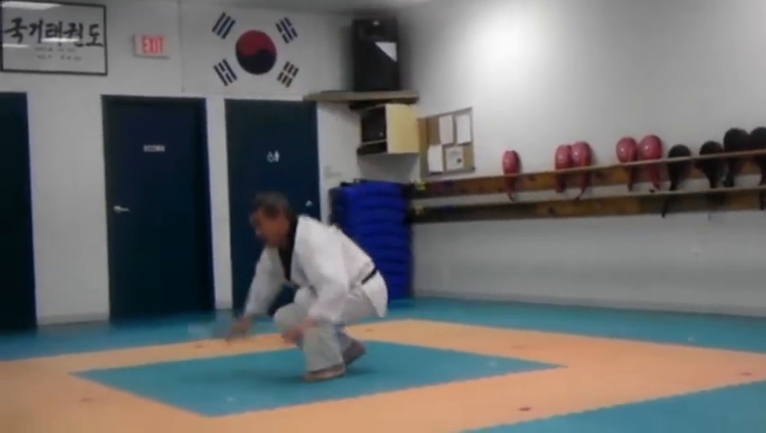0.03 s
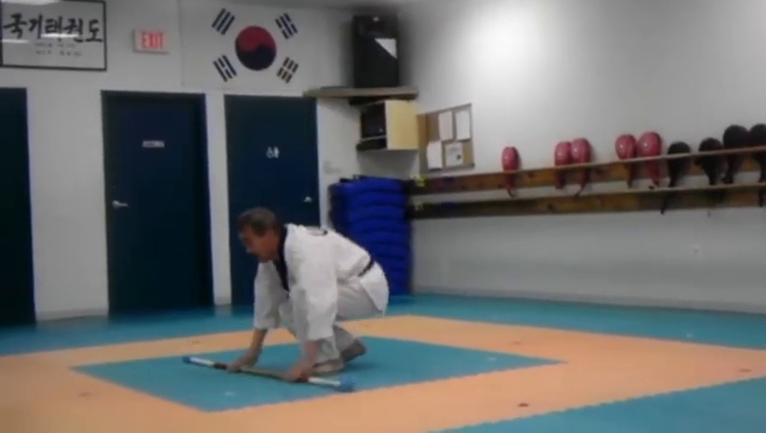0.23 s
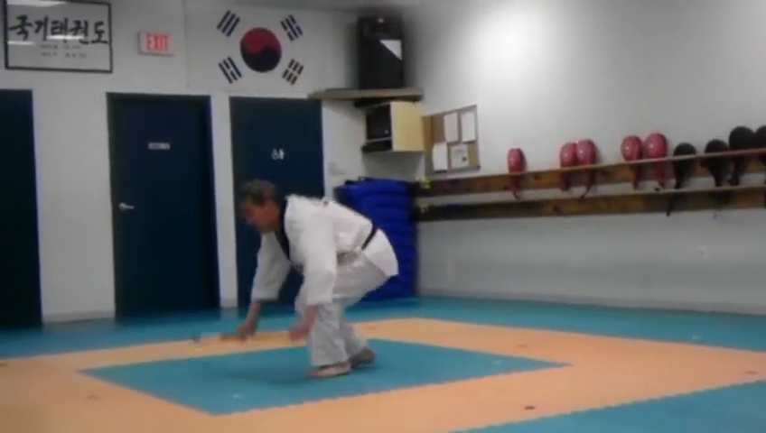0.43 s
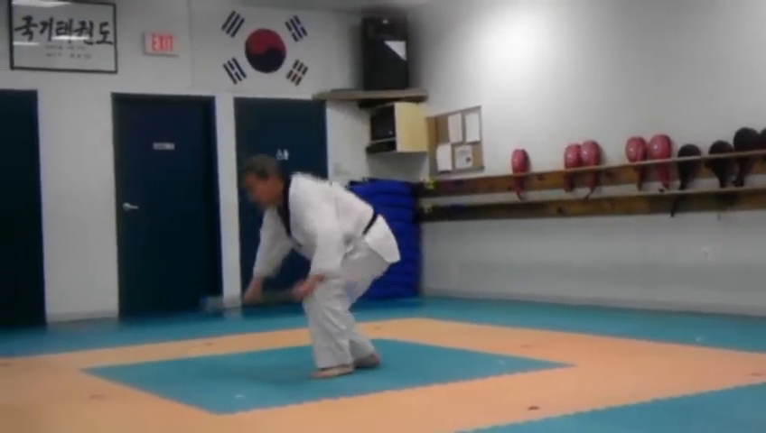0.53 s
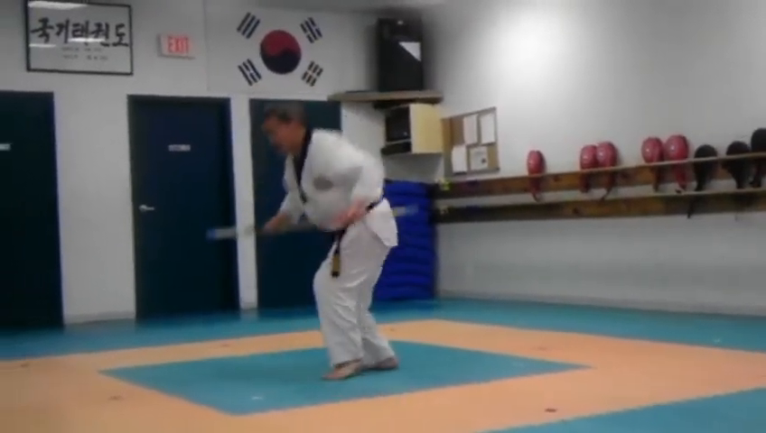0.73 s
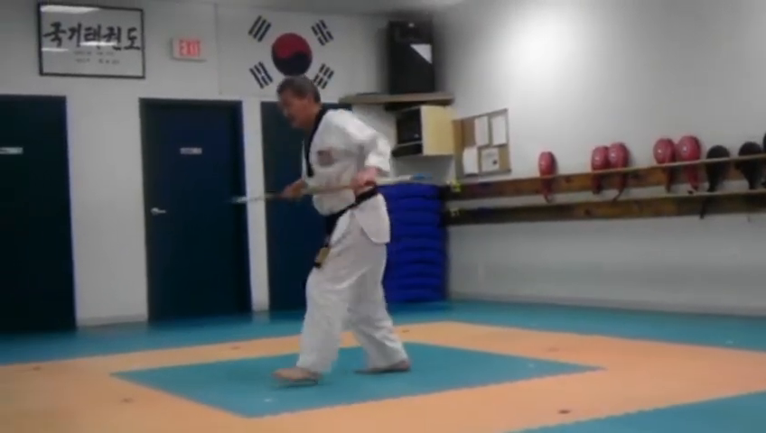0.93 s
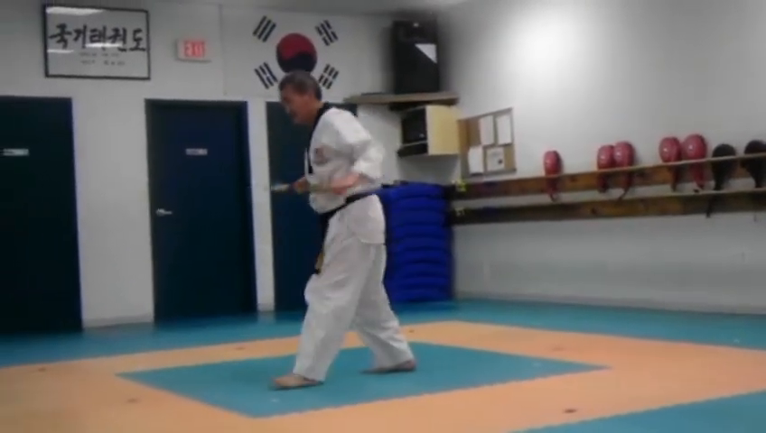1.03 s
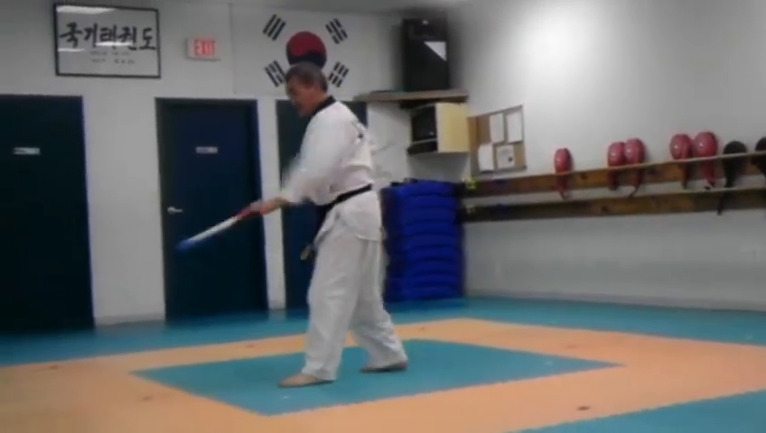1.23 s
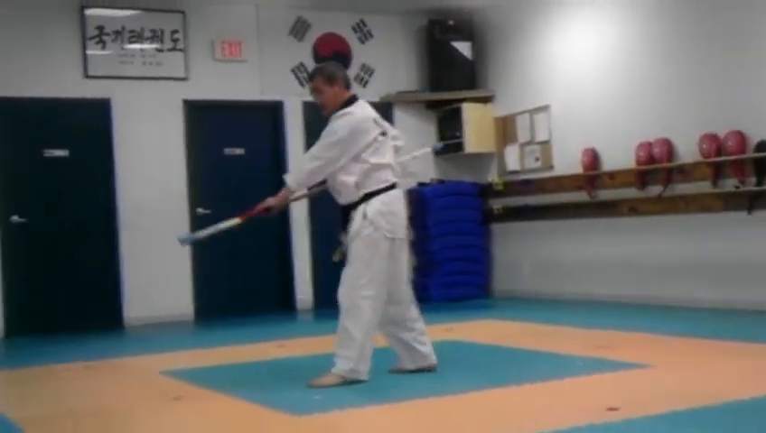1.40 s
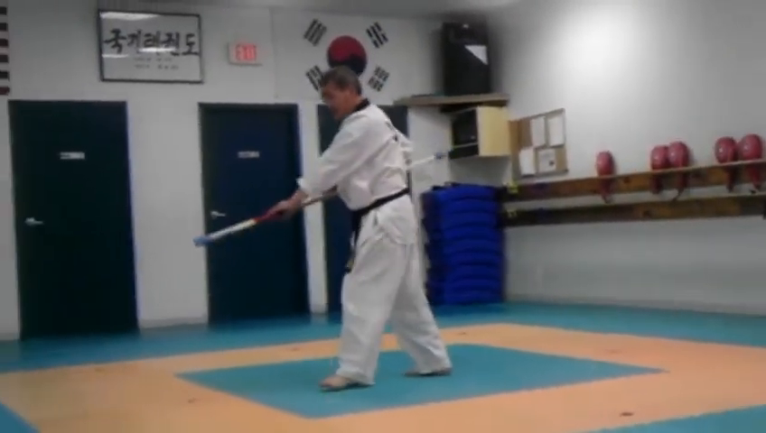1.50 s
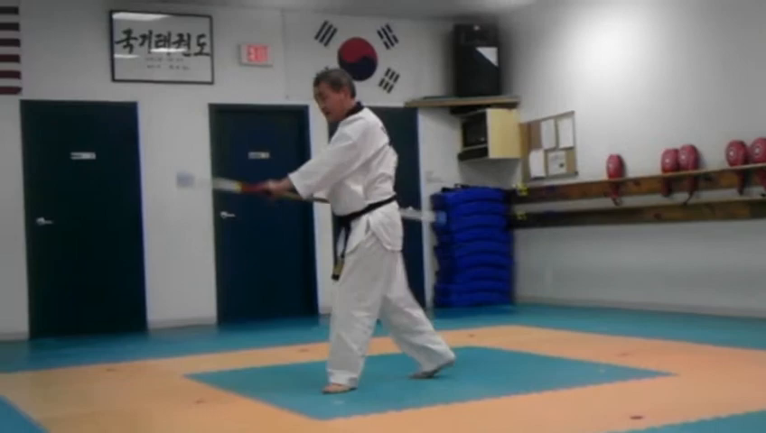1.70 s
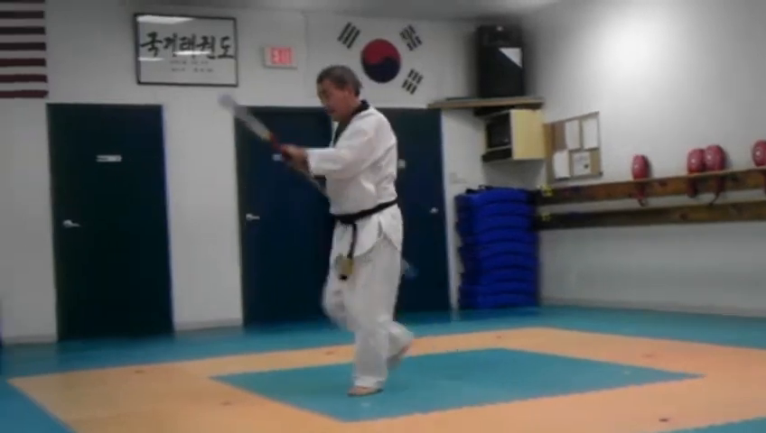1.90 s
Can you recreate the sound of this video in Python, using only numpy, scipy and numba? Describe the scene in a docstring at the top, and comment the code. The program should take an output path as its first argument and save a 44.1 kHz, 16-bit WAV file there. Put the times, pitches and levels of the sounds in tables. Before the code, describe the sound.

Over low ventilation noise and hum, a staff hits the matted floor with a sharp crack overloading a distant microphone; echoes and a roomy tail fade, then quiet cloth swishes, small snaps and dull barefoot steps.

```python
"""Ventilation rumble, hiss and a steady hum fill a bare training hall, with faint cloth: filtered noise and a sine.
Soon a wooden staff is slapped flat onto foam mats: one end touches, then the whole length lands with a crack.
Short pushes ring modes of staff and mat and press out noise; the blow overloads the recorder,
comes back off the walls as filtered echoes and rings on in the hall as decaying noise.
A second later bare feet pad on the mat and the uniform rustles and snaps with a swing of the staff: shaped noise."""
import sys
import numpy as np
from scipy import signal
from scipy.fft import rfft, irfft
from scipy.io import wavfile
from numba import njit

SR = 44100
rng = np.random.default_rng(int(sys.argv[2]) if len(sys.argv) > 2 else 0)


def master(y):
    """Save y as 16-bit WAV."""
    cut = np.clip(np.atleast_2d(y).T, -1, 1)
    pcm = np.round(cut * 32767)  # scale
    wavfile.write(sys.argv[1], SR, pcm.astype(np.int16))


N = 85995

# Modes of the staff lying on the mat. Each row: frequency in Hz, relative level in dB, 60 dB decay in s.
STAFF_MODES = [(333, -17, 0.44), (438, 0.5, 0.055), (541, 0, 0.021), (825, -11, 0.07), (1360, -21, 0.044),
               (1800, -25, 0.036), (1930, -28.5, 0.02), (2310, -31, .03), (2665, -22.5, 0.028),
               (3030, -24, .025)]


def undb(db):
    """Decibels to gain."""
    return 10 ** (np.asarray(db) / 20)


def along(points, hz, axis=1):
    """Read a column of a table on a log-frequency axis."""
    rows = np.array(points, float)
    log_hz = np.log(np.maximum(hz, 1))
    return np.interp(log_hz, np.log(rows[:, 0]), rows[:, axis])


def bins():
    """Frequencies in Hz of the spectrum of a whole track."""
    return np.arange(N // 2 + 1) * SR / N


def noise(colour):
    """Stereo noise of rms 1 in the given colour, wider in the treble."""
    # Stereo width. Each row: frequency in Hz, side against mid in dB.
    width = [(60, -20), (250, -14), (500, -13), (1000, -0.5), (3000, -1.5), (14000, -2)]
    mid, side = rfft(rng.standard_normal((2, N)))
    side = side * undb(along(width, bins()))
    left_right = np.array([mid + side, mid - side])
    x = irfft(left_right * undb(along(colour, bins())), N)
    return x / x.std()


def fade(t, t60):
    """Silence before time 0, then a fall of 60 dB in t60 seconds."""
    return (t >= 0) * np.exp(-np.log(1000) * np.maximum(t, 0) / t60)


def background(t):
    """The rumble and hiss of the ventilation as coloured noise, and mains hum as one sine."""
    # Colour of the room air. Each row: frequency in Hz, relative level in dB per Hz.
    air_colour = [(30, -36.5), (60, -13.5), (110, -9.5), (170, -1.5), (300, -5.5), (550, -13.5), (900, -16),
                  (1400, -22.5), (2200, -20.5), (3200, -29), (5300, -35.5), (6500, -43), (9500, -32.5),
                  (13500, -31)]
    air_db, hum_db, hum_hz = -55, -62.5, 119  # rms levels
    hum = np.sqrt(2) * np.sin(2 * np.pi * hum_hz * t)
    return undb(air_db) * noise(air_colour) + undb(hum_db) * hum


def uniform(t):
    """Heavy cotton sweeps through the air: a dull rush and a bright rub, both fluttering with the folds."""
    # Sweeps of sleeves and trousers. Each row: peak time in s, level in dB,
    # time constants of rise and of fall in s, rub against rush in dB.
    swishes = [(0.099, -55.5, 0.61, 0.66, -3.5), (0.84, -55.5, 0.099, 0.13, -3.5),
               (1.158, -54.5, 0.041, 0.12, -7.5), (1.269, -48.5, 0.024, 0.044, -4.5),
               (1.341, -49, 0.024, 0.049, 0), (1.388, -44.5, 0.026, 0.045, -33),
               (1.46, -52, 0.06, 0.064, -7)]
    # Colours of the dull rush and the bright rub. Each row: frequency in Hz, relative level in dB per Hz.
    rush_colour = [(100, -18.5), (200, -4), (400, -6), (600, -4.5), (900, -10.5), (1400, -16), (2200, -11),
                   (3200, -28.5), (6000, -40), (14000, -52.5)]
    rub_colour = [(1000, -33), (2200, 0), (3300, -7.5), (5200, -5), (6800, -12), (10500, -6.5),
                  (13000, -8.5)]
    flutter_db, flutter_hz = 1.5, 118.2  # spread of the random levels, and how many per second
    rush, rub = 0, 0
    for at, db, rise, fall, treble_db in swishes:
        swell = undb(db) * np.exp(np.minimum((t - at) / rise, (at - t) / fall))
        rush = rush + swell
        rub = rub + swell * undb(treble_db)
    folds = np.interp(t * flutter_hz, np.arange(1000), rng.standard_normal(1000))
    return undb(flutter_db * folds) * (rush * noise(rush_colour) + rub * noise(rub_colour))


def ring(t, hz, t60):
    """One mode after a push at time 0: a cosine that dies away."""
    return np.cos(2 * np.pi * hz * t) * fade(t, t60)


def ring_modes(t, modes):
    """All modes of a body ringing together after one push."""
    return sum(undb(db) * ring(t, hz, t60) for hz, db, t60 in modes)


def push(t, at, ms):
    """A smooth pulse of force that lasts as long as the contact; its sum is 1."""
    force = np.sin(np.pi * np.clip((t - at) * 1000 / ms, 0, 1)) ** 2
    return force / force.sum()


def delay(x, s):
    """One channel, s seconds later."""
    return np.interp(np.arange(N) - s * SR, np.arange(N), x, left=0)


def staff(t):
    """Each contact rings the staff, thumps the mat and squeezes out a crack; a longer contact is duller."""
    # Contacts of staff and mat. Each row: start in s, push on the staff in relative dB,
    # contact time in ms, crack in relative dB, push on the mat in relative dB.
    contacts = [(0.2277, -46, 0.44, -37, -71.5), (0.23, -15.5, 2.2, -51, -60.5),
                (0.2332, -18.5, 0.97, -36, -57.5), (0.2411, -9.5, 1.42, -25, -44.5),
                (0.2444, -6.5, 2.15, -26.5, -47.5), (0.2462, -15.5, 0.83, -1, -33),
                (0.248, -4, 0.85, -12, -28.5), (0.2516, 2, 1.33, -17, -8.5), (0.2553, 0, 1.4, -17, -29)]
    # Modes of the mat and the floor under it. Each row: frequency in Hz, relative level in dB, 60 dB decay in s.
    mat_modes = [(95, -2.5, 0.027), (168, 5.5, 0.029)]
    # Colour of the crack. Each row: frequency in Hz, relative level in dB per Hz.
    crack_colour = [(300, -6.5), (900, 15), (1600, -1), (3000, -4), (3800, -15), (5500, -16), (7500, -23),
                    (10500, -17.5), (14000, -18.5)]
    crack_t60_s, right_lag_s, blow_db = 0.021, 0.055 / 1000, 9.5
    on_staff, on_mat, crack = 0, 0, 0
    for at, db, contact_ms, crack_db, thump_db in contacts:
        force = push(t, at, contact_ms)
        on_staff = on_staff + undb(db) * force
        on_mat = on_mat + undb(thump_db) * force
        # the running sum of the force gives the crack its onset
        crack = crack + undb(crack_db) * np.cumsum(force) * fade(t - at, crack_t60_s)
    wood = signal.fftconvolve(on_staff, ring_modes(t, STAFF_MODES))
    thump = signal.fftconvolve(on_mat, ring_modes(t, mat_modes))
    body = (wood + thump)[:N]
    stereo_body = np.array([body, delay(body, right_lag_s)])
    return undb(blow_db) * (stereo_body + crack * noise(crack_colour))


def walls(x):
    """The first distinct reflections, robbed of bass and top by the surfaces."""
    # Reflections from ceiling and walls. Each row: delay in s, level in dB, left against right in dB.
    echoes = [(0.0184, -14, -4.5), (0.036, -12.5, 0)]
    low_hz, top_hz = 260, 5130
    band = signal.butter(2, [low_hz, top_hz], "band", fs=SR, output="sos")
    dull = signal.sosfilt(band, x)
    out = 0
    for s, db, pan in echoes:
        gain = undb(db + np.array([[pan], [-pan]]) / 2)
        out = out + gain * np.array([delay(channel, s) for channel in dull])
    return out


def spread_blow(t):
    """The blow as it spreads into the hall: one broad slap, with the ring of the staff behind it."""
    # Slap that the whole staff sends into the hall. Each row: frequency in Hz, relative level in dB.
    slap_colour = [(60, 22.5), (110, 24), (190, 40.5), (300, 45), (400, 50.5), (600, 47), (800, 40.5),
                   (1050, 42), (1400, 34), (2200, 26), (3100, 23.5), (3700, 20), (5000, 20), (14000, 17.5)]
    slap_s, ring_db = 0.248, 0.5
    at_slap = np.exp(-2j * np.pi * bins() * slap_s)  # phase that puts the pulse at its time
    slap = irfft(undb(along(slap_colour, bins())) * at_slap, N)
    return slap + undb(ring_db) * ring_modes(t - slap_s, STAFF_MODES)


def hall(t):
    """Diffuse response of the hall: each third of an octave builds up, then dies at its own rate."""
    # Ring of the hall. Each row: frequency in Hz, relative level in dB, 60 dB decay in s,
    # build-up time constant in s; the low boom comes late.
    hall_ring = [(60, -41, .4, .01), (118.5, -8.5, 1.9, 0.0053), (202, 1, 0.93, 0.0067),
                 (280, 9.5, 0.94, 0.18), (360, 1.5, 0.59, .03), (427, 3.5, 0.33, 0.024),
                 (576, 2.5, 0.59, 0.024), (770, 6.5, 0.78, 0.0031), (980, -5, 1, .008),
                 (1497, -5.5, 0.85, 0.003), (2370, -1, 0.77, .008), (3100, -13, 0.79, 0.0045),
                 (4940, 0, 0.61, 0.0027), (7500, -11.5, 0.083, 0.0017), (14000, -15, .1, 0.0026)]
    spectrum = rfft(noise([(20, 0), (20000, 0)]))
    place = 3 * np.log2(np.maximum(bins(), 1) / 40)  # thirds of an octave above 40 Hz
    out = 0
    for k in range(27):
        hz = 40 * 2 ** (k / 3)
        band = irfft(spectrum * np.maximum(1 - abs(place - k), 0), N)  # overlapping triangles
        build = 1 - np.exp(-t / along(hall_ring, hz, axis=3))
        decay = fade(t, along(hall_ring, hz, axis=2))
        out = out + band * undb(along(hall_ring, hz)) * build * decay
    return out * np.sqrt(2 * np.log(1000) / SR)


def feet(t):
    """Bare feet land with dull pads on the foam: noise that swells briefly and dies."""
    # Soft footfalls. Each row: start in s, relative level in dB.
    steps = [(1.165, -42.5), (1.429, -40.5), (1.571, -44), (1.650, -73), (1.787, -47), (1.806, -51.5),
             (1.843, -48.5)]
    # Colour of a pad. Each row: frequency in Hz, relative level in dB per Hz.
    step_colour = [(50, -20), (130, 13), (220, 15.5), (320, 11), (500, -36), (1500, -24), (5000, -24.5)]
    rise_s, t60_s = 0.005, 0.11
    weight = 0
    for at, db in steps:
        weight = weight + undb(db) * np.clip((t - at) / rise_s, 0, 1) * fade(t - at, t60_s)
    return weight * noise(step_colour)


def snaps(t):
    """Folds of the sleeve pull taut with short, crisp ticks: noise bursts around one pitch each."""
    # Snaps of the cotton. Each row: start in s, level in dB, centre in Hz.
    taut_folds = [(1.2665, -44, 5000), (1.272, -45, 6500), (1.33, -58, 1960), (1.34, -54, 1960),
                  (1.368, -44, 900), (1.373, -45, 2000), (1.392, -41.5, 2000), (1.402, -54, 1300)]
    t60_s, db_per_octave = 0.023, 19  # decay, and slope to both sides of the centre
    octaves = np.array([-4, 0, 4])
    out = 0
    for at, db, hz in taut_folds:
        colour = list(zip(hz * 2. ** octaves, -db_per_octave * abs(octaves)))
        out = out + undb(db) * fade(t - at, t60_s) * noise(colour)
    return out


def scene():
    """Staff, cloth and feet, heard directly and through the hall, over the background."""
    t = np.arange(N) / SR
    cloth_send_db, step_send_db = -7, -18
    blow = staff(t)
    cloth = uniform(t) + snaps(t)
    steps = feet(t)
    send = spread_blow(t) + undb(cloth_send_db) * cloth + undb(step_send_db) * steps
    tail = signal.fftconvolve(send, hall(t), axes=1)[:, :N]
    return blow + walls(blow) + cloth + steps + tail + background(t)


@njit
def follow(size, attack_s, release_s):
    """A level meter that rises quickly and falls slowly."""
    out, e = np.empty(len(size)), 0.
    for i in range(len(size)):
        e += (size[i] - e) / (SR * (attack_s if size[i] > e else release_s))
        out[i] = e
    return out


def record(dry):
    """The recorder turns down too late for the blow, flattens the peaks and cuts the deep bass and the top."""
    threshold_db, ratio, attack_s, release_s = -13, 1.94, 0.012, 0.14
    clip_knee = 13  # higher is a harder corner
    low_cut_hz, top_hz = 53, 13900
    meter = follow(abs(dry).max(axis=0), attack_s, release_s)
    x = dry * np.maximum(meter / undb(threshold_db), 1) ** (1 / ratio - 1)
    x = x / (1 + abs(x) ** clip_knee) ** (1 / clip_knee)
    x = signal.sosfilt(signal.butter(3, low_cut_hz, "high", fs=SR, output="sos"), x)
    return signal.sosfilt(signal.ellip(8, .2, 70, top_hz, fs=SR, output="sos"), x)


dry = scene()
out = record(dry)
master(out)
```